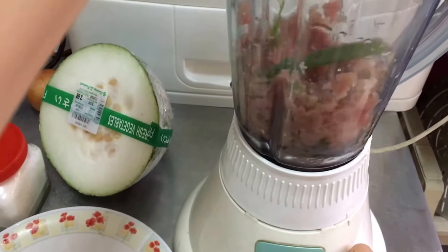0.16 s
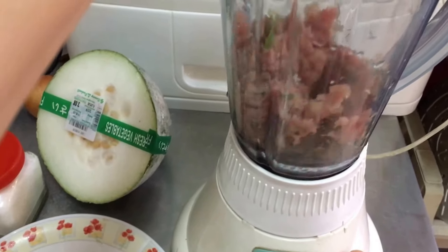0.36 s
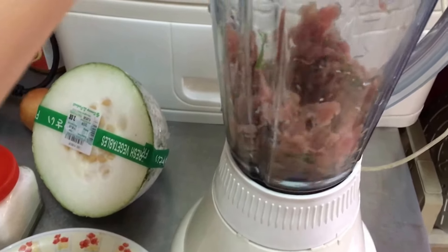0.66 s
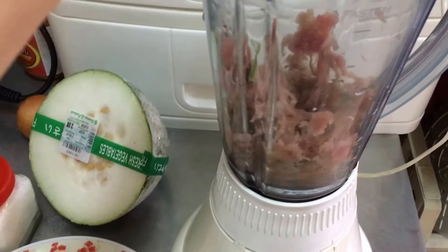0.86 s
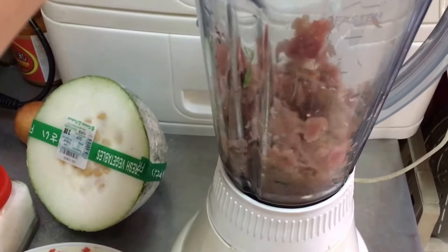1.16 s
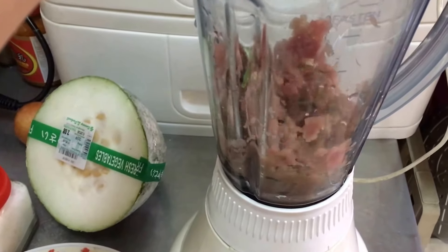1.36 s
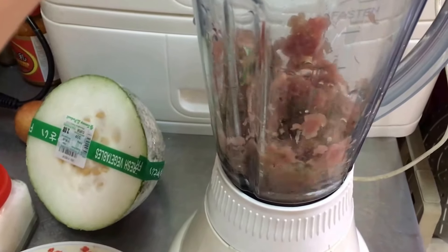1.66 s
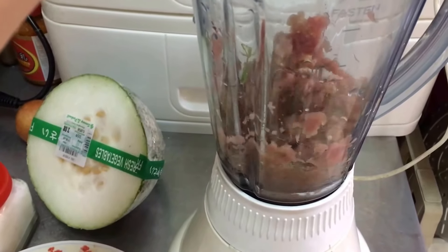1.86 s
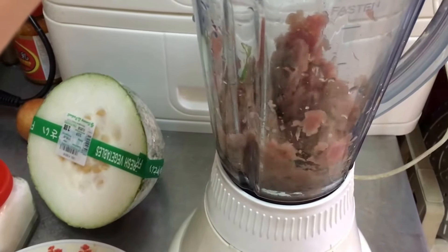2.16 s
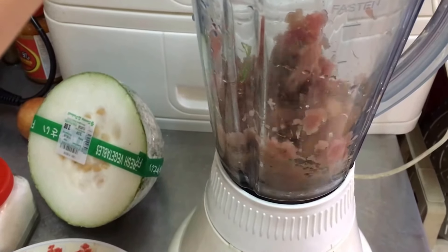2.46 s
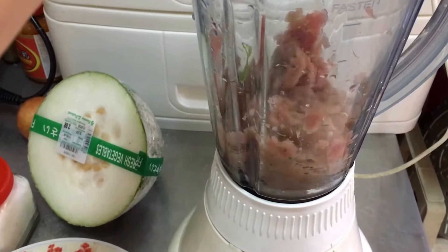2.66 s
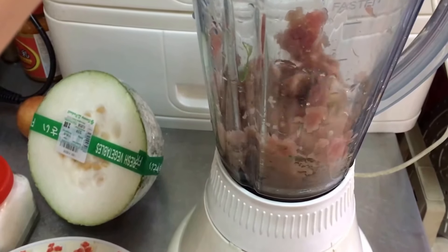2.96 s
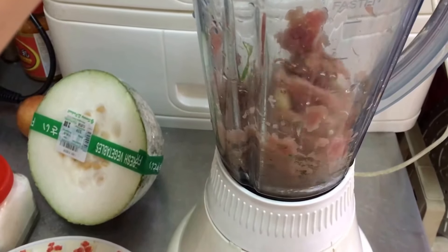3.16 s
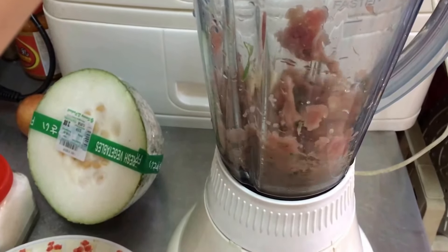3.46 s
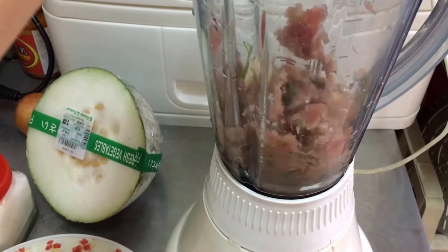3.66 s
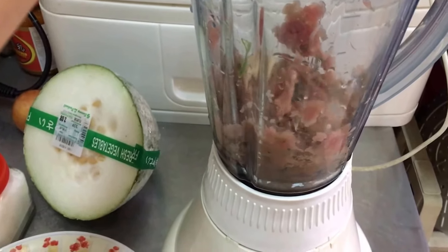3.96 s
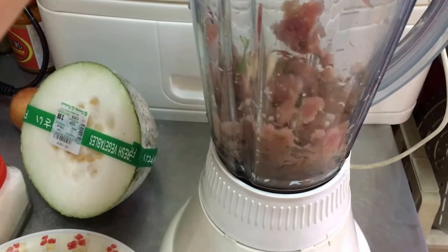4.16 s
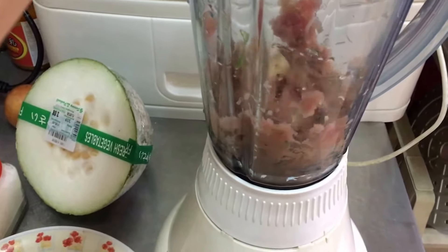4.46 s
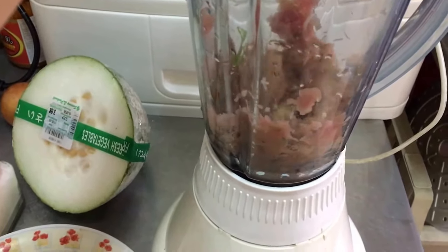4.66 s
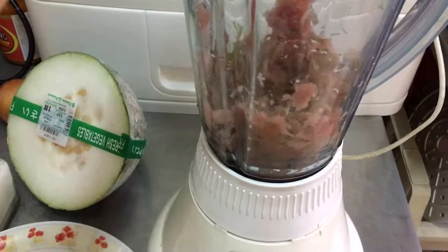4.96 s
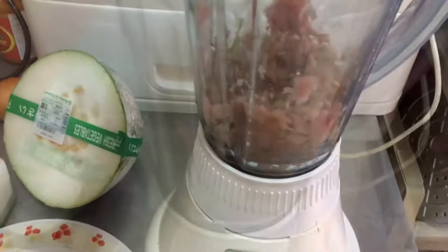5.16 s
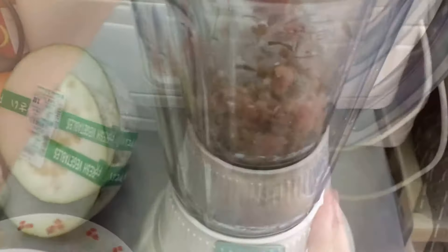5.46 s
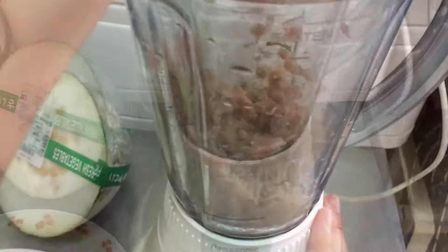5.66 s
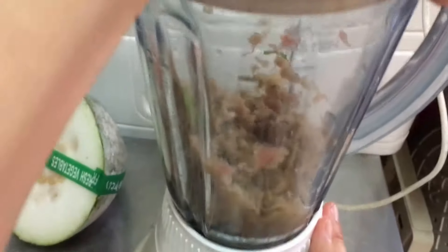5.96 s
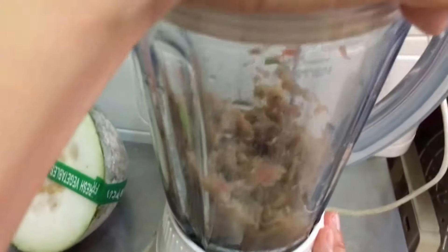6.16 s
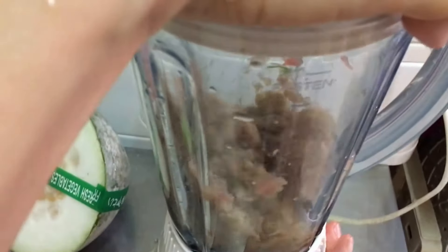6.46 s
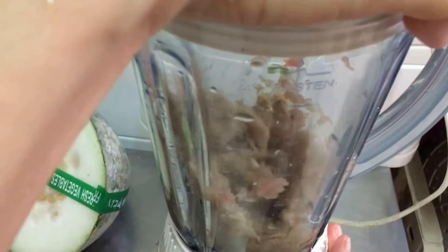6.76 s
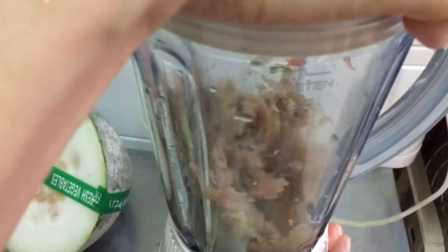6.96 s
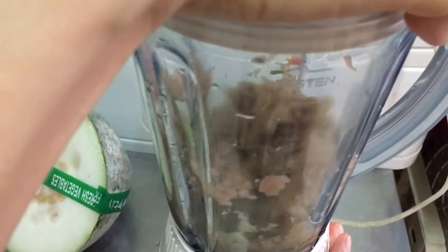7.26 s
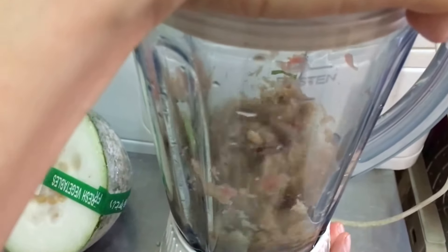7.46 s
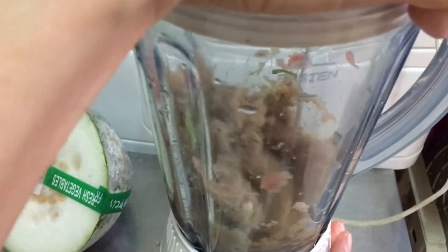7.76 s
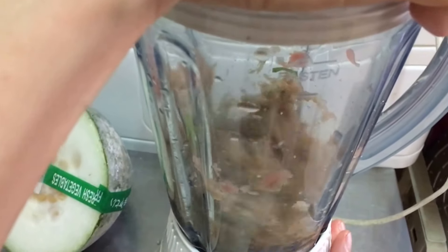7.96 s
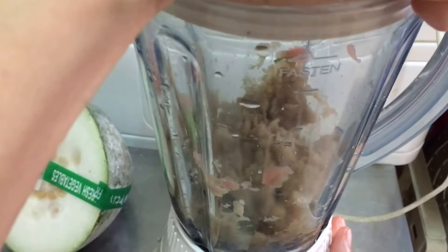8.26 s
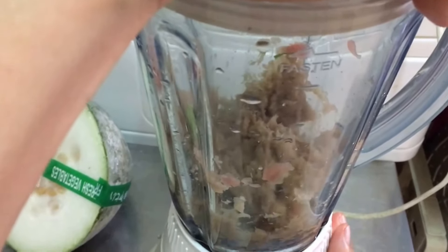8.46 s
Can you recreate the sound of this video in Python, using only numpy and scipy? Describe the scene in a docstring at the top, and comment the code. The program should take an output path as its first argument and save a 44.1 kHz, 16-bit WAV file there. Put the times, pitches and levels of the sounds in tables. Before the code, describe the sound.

A blender whirs faintly for about four seconds, with uneven wet slumps and tiny ticks against the jug, followed by one short pulse. Louder low room tone arrives with hard plastic clicks. A much louder, lower and rougher motor run bursts in, growling and spattering, then is abruptly turned down to a distant-sounding murmur and stops.

```python
"""In a kitchen, a countertop blender chops two batches of meat. The playback volume is low for the first,
jumps up in the pause (room rumble, two trains of faint chirr, button clicks) and drops as the second runs.
Churning food is noise ringing the jug's resonances; shaft and mains lines are sines humming under it.
Food scraps tick as short noise bursts; the buttons are a blow and rattle ringing a plastic housing."""
import sys
import numpy as np
from scipy import signal
from scipy.fft import rfft, irfft
from scipy.io import wavfile
from scipy.ndimage import uniform_filter1d

SR = 44100
rng = np.random.default_rng(int(sys.argv[2]) if len(sys.argv) > 2 else 0)


def file_out(sig):
    """Save sig as 16-bit WAV at sys.argv[1]."""
    # one column per channel
    cols = np.atleast_2d(sig).T
    # limit, then scale
    lim = np.clip(cols, -1, 1)
    pcm = np.round(lim * 32767).astype(np.int16)
    wavfile.write(sys.argv[1], SR, pcm)


N = 379260

# span of high playback volume: start t/s, end t/s
VOLUME_UP_S, VOLUME_DOWN_S = 5.027, 7.46
VOLUME_FADE_S = 0.012


def undb(db):
    """Level law: amplitude ratio of a level in dB."""
    return 10 ** (np.asarray(db) / 20)


def unit(x):
    """Normalisation of power: scale to rms 1."""
    return x / np.sqrt(np.mean(x ** 2))


def walk(rate):
    """Band-limited random fluctuation: steps drawn at a rate in Hz, averaged twice, with spread 1."""
    steps = rng.standard_normal(int(N / SR * rate) + 3)
    held = np.repeat(steps, 16)
    smooth = uniform_filter1d(uniform_filter1d(held, 16), 16)
    return np.interp(np.arange(N) * (16 * rate / SR), np.arange(len(smooth)), unit(smooth))


def colour(x, points, peaks=()):
    """Minimum-phase filtering: a causal response through (f/Hz, level/dB) points with resonances added."""
    hz = np.fft.rfftfreq(8192, 1 / SR) + 1
    db = np.interp(np.log(hz), np.log([p[0] for p in points]), [p[1] for p in points])
    for centre, width, lift_db in peaks:
        db += lift_db / (1 + (2 * (hz - centre) / width) ** 2)
    # folding the cepstrum onto positive times makes the response causal
    cepstrum = irfft(np.log(undb(db)))
    cepstrum[1:4096] *= 2
    cepstrum[4097:] = 0
    response = irfft(np.exp(rfft(cepstrum)))
    return signal.oaconvolve(x, response)[:len(x)]


def band(x, lo_hz, hi_hz):
    """Band-pass filtering with a maximally flat (Butterworth) response."""
    edges = [lo_hz, min(hi_hz, .45 * SR)]
    return signal.sosfilt(signal.butter(3, edges, "band", fs=SR, output="sos"), x)


def add(out, s, sound, db):
    """Superposition: add a sound at a time in s, its peak scaled to a level in dB."""
    i = int(s * SR)
    scaled = sound * undb(db) / np.abs(sound).max()
    out[i:i + len(sound)] += scaled[:N - i]


def motor(t, runs):
    """Torque balance: speed sags under load and when coasting; levels start, swell with slumps and wander."""
    # shaft speed, sagging as food loads the blades: t/s, f/Hz
    speed = [(0, 130.7), (.3, 120.3), (.57, 121.4), (.9, 132.8), (1.35, 129.8), (1.55, 135.4), (2, 124.7),
             (2.14, 130.1), (2.52, 118.4), (3, 130), (3.95, 131.8), (4.43, 112), (4.55, 126.8),
             (4.8, 126.7), (6.26, 101.2), (6.37, 100.2), (6.45, 92.9), (6.75, 92.18), (7, 87.1),
             (7.1, 81.1), (7.22, 85.2), (7.5, 79), (8.2, 74.86)]
    # food slumping onto the blades: t/s, half length/s, change of roar, boom and treble level/dB
    slumps = [(.14, 0.039, 2, 6, 3), (.46, .04, 2.5, 4, 1), (.7, 0.048, 1, 6, 2), (1, 0.05, 1, 0, 5),
              (1.27, 0.026, 2.5, 1, 2), (1.65, 0.04, 1, 5, 1), (1.85, 0.042, 1, 0, 3),
              (1.97, 0.066, 1.5, 4, 0), (2.183, 0.031, 1.5, -2, 1.5), (2.33, 0.027, 1, 6, 0.5),
              (2.53, 0.039, 3, -2, 0.5), (2.763, 0.023, 5, -1, 2), (3.082, .03, 4, 0.1, -0.5),
              (3.159, 0.023, 6, 0, 1.5), (3.32, .03, 3, -3, 1.5), (3.42, .03, 0.5, 0, -1.5),
              (3.62, .07, 1.3, -6, 5.5), (3.978, .03, 4.5, 5, -2), (4.557, 0.034, 1, 6, 0),
              (4.731, 0.034, 0, -8, 3), (6.47, 0.051, 2.5, -2, 0.5), (6.559, 0.034, -1.5, 6, -1.5),
              (6.694, .04, 0.8, 3, 2), (6.776, 0.031, 2, -5, 0), (6.93, 0.027, 0.5, 2.5, -0.5),
              (7.09, 0.056, 0.5, 5.5, 1.5), (7.44, .04, -0.4, 7, 2), (7.57, .05, 0.4, 2, 4.5),
              (7.803, 0.048, 1.5, -6, 2.5), (7.88, 0.029, 0.5, 9, 0), (8.139, 0.025, 1, 6, 2)]
    start_db, coast_sag_per_s = -5.5, .7  # level as the switch closes; rate of exponential speed loss
    volume_drop_db = -36
    run_starts = [r[0] - .014 for r in runs]
    run_index = np.maximum(np.searchsorted(run_starts, t) - 1, 0)
    on, off, start, coast, roar, boom, treble, drift = np.array(runs)[run_index].T

    coasting = np.maximum(t - off, 0)
    hz = np.interp(t, *np.transpose(speed)) * np.exp(-coast_sag_per_s * coasting)
    swell = sum(np.outer(db, np.exp(-((t - s) / half) ** 2)) for s, half, *db in slumps)
    fade_s = [VOLUME_DOWN_S - VOLUME_FADE_S / 2, VOLUME_DOWN_S + VOLUME_FADE_S]
    volume_db = np.interp(t, fade_s, [0, volume_drop_db])

    start_up_db = start_db * np.clip(1 - (t - on) / start, 0, 1)
    roar_db = roar + start_up_db + coast * coasting + volume_db + swell[0] + 0.55 * walk(9)
    # the sound rises from silence in the 13 ms before the switch-on time
    gain = undb(roar_db) * np.clip(1 + (t - on) / 0.013, 0, 1) ** 0.53
    boom_db = boom + swell[1] + 1.4 * walk(11)
    treble_db = treble + drift * (t - on) + swell[2] + 0.49 * walk(8)
    running = (t > on) & (t < off)
    return hz, gain, boom_db, treble_db, running


def shaft_hum(hz, turns, shaft, boom_db, in_boom):
    """Unbalanced rotation: sines on multiples of the shaft speed, lifted as they glide through resonances."""
    # resonances of the housing: f/Hz, width/Hz, lift/dB
    housing = [(187.27, 30, 6), (374, 30, 7), (305, 20, 5.5)]
    hum = 0
    for (multiple, db), near in zip(shaft, in_boom):
        lift_db = sum(lift / (1 + (2 * (multiple * hz - centre) / width) ** 2)
                      for centre, width, lift in housing)
        # lines near the jug's boom follow its level
        follow_db = near * 0.75 * (boom_db + 2.5)
        line_db = db + 2.6 * walk(12) + follow_db + lift_db - 3
        hum = hum + undb(line_db) * np.sin(2 * np.pi * multiple * turns)
    return hum


def mains_hum(t, mains_db):
    """Magnetic forcing: the field winding buzzes at twice the mains frequency and its multiples."""
    # mains lines: f/Hz, level relative to mains_db/dB
    mains_lines = [(100, -2.5), (200, 0), (300, -9), (400, -4.5)]
    return sum(undb(mains_db + db + 3.8 * walk(8)) * np.sin(2 * np.pi * f * t) for f, db in mains_lines)


def blender(runs, roar, jug, shaft, grain_db, knock_db, mains_db, throb, patchy_db=1.58):
    """Forced resonance: churning food and a knock on every turn ring the jug over shaft and mains hum."""
    t = np.arange(N) / SR
    hz, gain, boom_db, treble_db, on = motor(t, runs)
    turns = np.cumsum(hz * (1 + .006 * walk(25))) / SR
    churn = rng.standard_normal(N) * (1 + throb * np.cos(2 * np.pi * turns))
    # the coupling knocks once a turn, randomly harder or softer
    knocks = unit(np.diff(np.floor(turns), prepend=0) * undb(2.0 * walk(30)))
    body = colour(churn + undb(knock_db) * knocks, roar, jug)
    body /= np.std(band(body, 500, 3000))

    boom_hz, width = jug[0][0], 1.5 * jug[0][1]
    boom = band(body, boom_hz - width, boom_hz + width)
    treble = band(body, 3500, 17000)
    body = body - boom - treble

    # drops of all sizes reach the wall in uneven clumps, so the treble crackles and flickers
    mean_treble_db = treble_db[on].mean()
    clumps = np.repeat(rng.exponential(size=N // 24 + 1), 24)[:N]
    drops = undb(np.maximum(grain_db + .08 * (treble_db - mean_treble_db), 0) * clumps)
    # the finest spray swells more than the rest as the treble rises
    spray = band(treble, 9500, 17000)
    burst_db = .5 * (treble_db - mean_treble_db) + 1.2 * walk(14)
    spatter = unit((treble + (undb(burst_db) - 1) * spray) * drops)
    spatter = spatter * undb(treble_db + 0.96 * walk(30))

    in_boom = [abs(multiple * hz[on].mean() - boom_hz) < width for multiple, _ in shaft]
    lines = shaft_hum(hz, turns, shaft, boom_db, in_boom)
    # each part of the jug wall is hit in its own uneven rhythm
    for lo_hz in (1100, 1500, 2000, 2700):
        body = body + (undb(patchy_db * walk(18)) - 1) * band(body, lo_hz, 1.28 * lo_hz)
    body = body * undb(0.33 * walk(14))
    boom = unit(boom) * undb(boom_db - 2.5)
    return (body + boom + spatter + lines + mains_hum(t, mains_db)) * gain


def chirr(t, up):
    """Amplitude modulation: noise near 5.7 kHz pulses in two trains that swell and fade."""
    # pulse trains: middle pulse t/s, half length/s, level/dB
    trains = [(5.315, .28, -75), (6.043, .22, -73.5)]
    period_s = .097
    swell = 0
    for s, half, db in trains:
        to_pulse = ((t - s) / period_s + .5) % 1 * period_s - period_s / 2
        swell = swell + undb(db) * np.exp(-(to_pulse / .022) ** 2 - ((t - s) / half) ** 4)
    return up * swell * unit(band(rng.standard_normal(N), 5200, 6340))


def kitchen():
    """Stationary coloured noise: the room, louder and deeper while the volume is up, with a faint chirr."""
    # room spectra with the volume low and high: f/Hz, relative level per Hz/dB
    room_low = [(18, -32), (30, -11), (70, -3.5), (134, -4), (165, -10.5), (184, -4.5), (760, -15.5),
                (889, -15), (8740, -30.5), (16000, -38)]
    room_high = [(12, -46.5), (20, -8.5), (48, 1.5), (134, -13.5), (193, -5.5), (347, -10), (513, -17),
                 (1000, -17.5), (1710, -23.5), (3500, -31), (6600, -38), (10000, -41), (16000, -50.5)]
    low_db, high_db = -72, -56
    t = np.arange(N) / SR
    up = (t > VOLUME_UP_S) & (t < VOLUME_DOWN_S)
    low = unit(colour(rng.standard_normal(N), room_low)) * undb(low_db + .6 * walk(5.2))
    high = unit(colour(rng.standard_normal(N), room_high)) * undb(high_db + 0.51 * walk(12))
    return np.where(up, high, low) + chirr(t, up)


def scraps():
    """Impact: each hard scrap hitting the jug wall is a short broadband tick of its own brightness."""
    # scraps: t/s, peak level before a common 1 dB cut/dB, treble level before a common 4 dB lift/dB
    hits = [(0.064, -35, -9), (0.2124, -48, -4), (0.2251, -39.5, -10), (0.9199, -57, -14),
            (1.1478, -48, -16), (1.8083, -51, -15), (3.0312, -56, -11), (3.397, -43.5, -26),
            (4.7269, -47, -22), (4.819, -56, -7), (6.4717, -14, -24), (6.7408, -15.5, -21),
            (7.0933, -15.5, 0), (7.369, -15, -17), (7.5634, -44.5, -15), (7.6966, -52, -17),
            (7.7255, -48, -21), (7.7707, -48, -17), (7.7978, -40, -19), (7.8248, -44, -11),
            (8.1299, -52, -15), (8.1436, -46, -20), (8.2025, -47, -5)]
    out, t = np.zeros(N), np.arange(int(.02 * SR)) / SR
    for s, db, treble_db in hits:
        tick = rng.standard_normal(len(t)) * undb(-60 * t / 0.0079)
        low = band(tick, 900, 3000)
        mid = band(tick, 3000, 8000)
        high = band(tick, 8000, 16000)
        add(out, s, undb(-0.5) * low + mid + undb(treble_db + 4.0) * high, db - 1.0)
    return out


def buttons():
    """Impulse response: a blow and a few ms of rattle ring the plastic housing; the kitchen reverberates."""
    # button clicks: t/s, peak level before a common 4.5 dB lift/dB, treble level before a 5.5 dB lift/dB
    clicks = [(5.443, -33.5, -15.5), (5.631, -28.5, -13.5), (5.74, -50, -19)]
    # spectrum of a click: f/Hz, relative level per Hz/dB
    clack_points = [(120, -40), (250, -18.5), (700, -16), (2000, -17.5), (3700, -23.5), (7500, -39),
                    (16000, -47)]
    # resonances of the housing: f/Hz, width/Hz, lift/dB
    button_peaks = [(353, 65, 14), (1011, 160, 19.5), (1340, 52, 8), (1650, 24, 14), (1980, 73, 10),
                    (2420, 120, 4), (2910, 400, 15.5), (4470, 300, 5), (5860, 480, 13), (6640, 500, 10),
                    (9450, 500, 3)]
    blow_s = .0035  # time of the blow within each click
    # the walls blur the housing's ring
    blurred_peaks = [(hz, 2 * width, .5 * lift) for hz, width, lift in button_peaks]
    out, t = np.zeros(N), np.arange(int(.3 * SR)) / SR
    for s, db, treble_db in clicks:
        noise = rng.standard_normal((2, len(t)))
        rattle = noise[0] * (t / 0.0025) * np.exp(-t / 0.0038)
        blow = 1.66 * np.exp(-((t - blow_s) / 0.00011) ** 2) + rattle
        tail = noise[1] * (1 - np.exp(-t / 0.0059)) * undb(-60 * t / 0.26)
        clack = colour(blow, clack_points, button_peaks) + 0.45 * colour(tail, clack_points, blurred_peaks)
        high = band(clack, 3500, 17000)
        add(out, s - blow_s, unit(clack - high) + undb(treble_db + 5.5) * unit(high), db + 4.5)
    return out


def scene():
    """Superposition of both batches, the room, the scraps and the buttons."""
    # motor runs: on t/s, off t/s, start-up/s, coasting/(dB/s), nominal roar, boom and treble level/dB,
    # treble drift/(dB/s)
    first_runs = [(-.1, 4.03, .05, -190, -55, -8.5, -9.5, -0.15),
                  (4.43, 4.76, 0.13, -140, -57, -4.5, -12, 1)]
    second_runs = [(6.275, 8.215, 0.028, -330, -24, -2.2, -11.5, 0.87)]
    # colour of the roar: f/Hz, relative level per Hz/dB
    roar_first = [(29, -50), (50, -31), (122, -20), (163, -17), (189, -17), (291, -13.5), (380, -9.5),
                  (586, -16.5), (973, -2), (1100, -9.5), (1400, -6.5), (8540, -28), (16000, -38.5)]
    roar_second = [(29, -61), (50, -41.5), (87, -20), (131, -16), (189, -11), (234, -16.5), (362, 2),
                   (483, -13.5), (765, -16.5), (905, -9.5), (3580, -25), (9180, -32), (16000, -41.5)]
    # resonances of jug and housing, the boom first: f/Hz, width/Hz, lift/dB
    jug_first = [(380.3, 41, 7.5), (952, 46, 5.5), (994, 33, 6.5), (800, 79, 2), (661, 20, 9.5),
                 (590, 50, 1), (1350, 67, 1.5), (1413, 50, 2), (1540, 120, -2), (2380, 190, 3),
                 (1960, 150, 1), (4560, 71, 6.5), (5510, 130, 6), (7640, 360, -7.5), (8730, 1900, 5),
                 (11500, 900, 3.5), (10300, 540, -3)]
    jug_second = [(365, 70, 4.5), (876, 54, 4), (970, 67, 3), (1100, 45, -4.5), (1129, 40, 6.5),
                  (455.4, 50, -7), (225.3, 30, -10), (128.4, 30, -3), (1426, 40, 7.5), (1910, 73, 2.5),
                  (2026, 93, 6), (4380, 300, 1.5), (5920, 250, 5.5), (9380, 150, 7), (10500, 600, -5.5)]
    # shaft lines: multiple of the speed, nominal level relative to the roar/dB
    shaft_first = [(1, -15.5), (2, -24), (3, -7), (4, -17), (5, -24), (6, -14), (10, -28)]
    shaft_second = [(1, -10.5), (2, -11), (3, -17), (4, -3.5), (5, -21.5), (6, -16), (8, -22.5), (12, -12)]
    # shift of the second batch's colour once the volume is down: f/Hz, level/dB
    late_colour = [(60, -1.5), (150, -4), (220, 2.5), (330, -1.5), (470, 0.5), (900, 1.5), (1300, -3),
                   (1900, 2.5), (2900, 2.5), (6000, 0), (16000, -1.5)]

    first = blender(first_runs, roar_first, jug_first, shaft_first,
                    grain_db=2.36, knock_db=-8.5, mains_db=-21, throb=0.022)
    second = blender(second_runs, roar_second, jug_second, shaft_second,
                     grain_db=1.0, knock_db=-7.5, mains_db=-16, throb=0.044)
    before_drop = np.arange(N) / SR < VOLUME_DOWN_S + VOLUME_FADE_S
    second = np.where(before_drop, second, colour(second, late_colour))
    return (first + second + kitchen() + scraps() + buttons())[None]


def record(dry):
    """Soft saturation rounds the loudest peaks; a steep elliptic low-pass cuts the top."""
    top_hz = 15780
    rounded = np.tanh(1.3 * dry) / 1.3
    return signal.sosfilt(signal.ellip(12, .2, 80, top_hz, fs=SR, output="sos"), rounded)


dry = scene()
out = record(dry)
file_out(out)
```